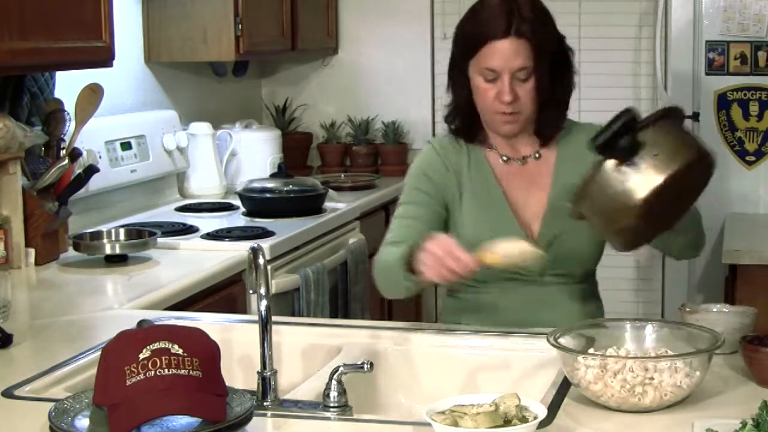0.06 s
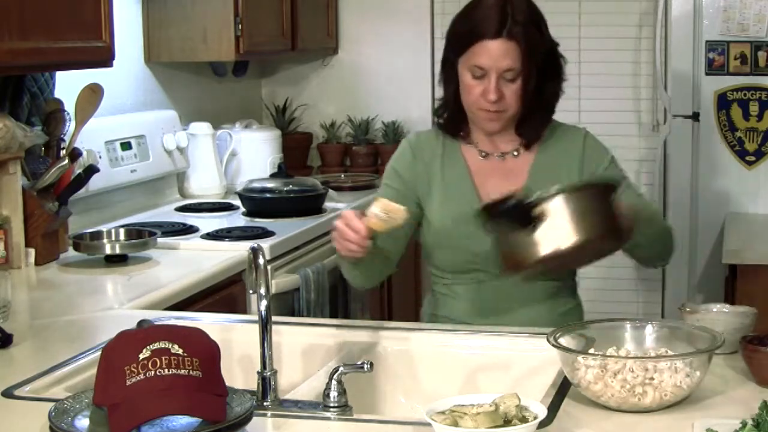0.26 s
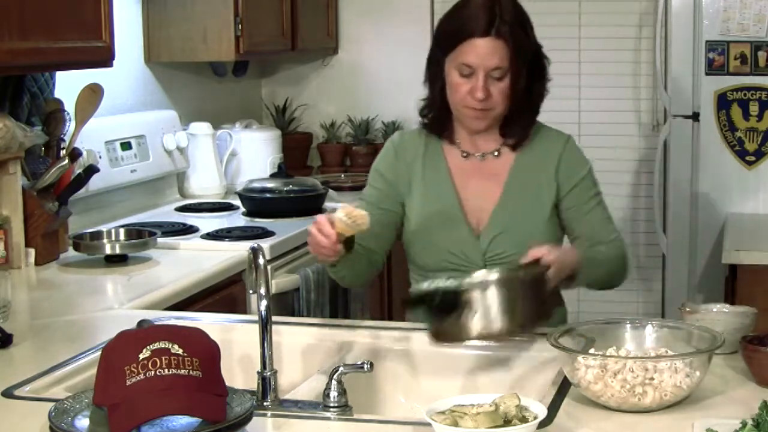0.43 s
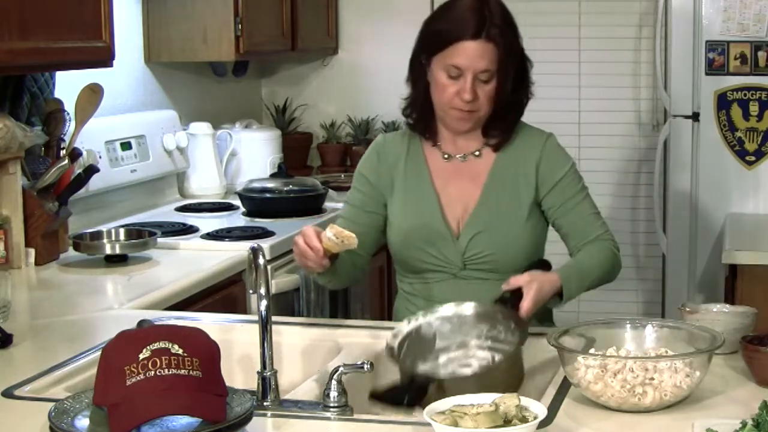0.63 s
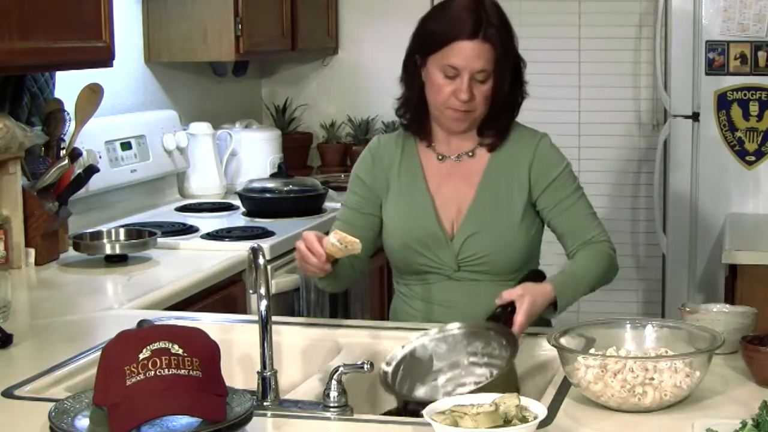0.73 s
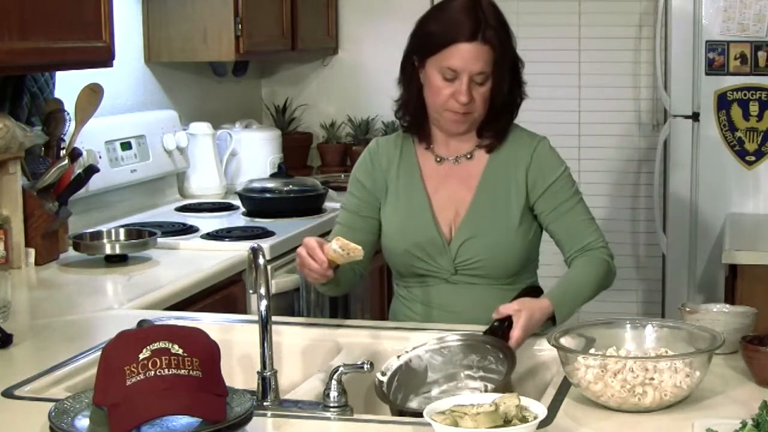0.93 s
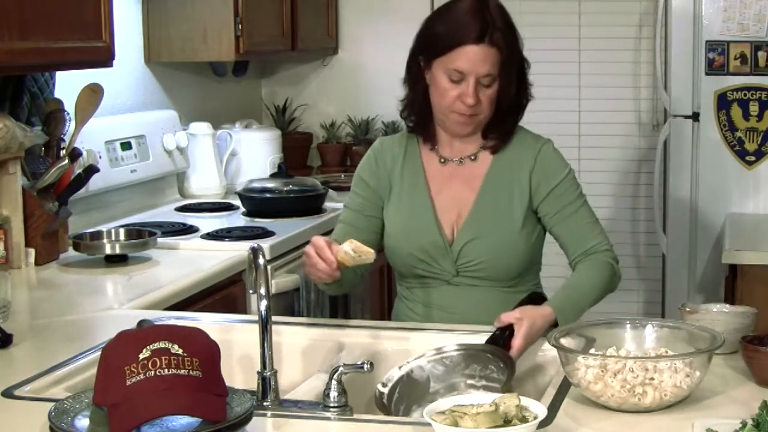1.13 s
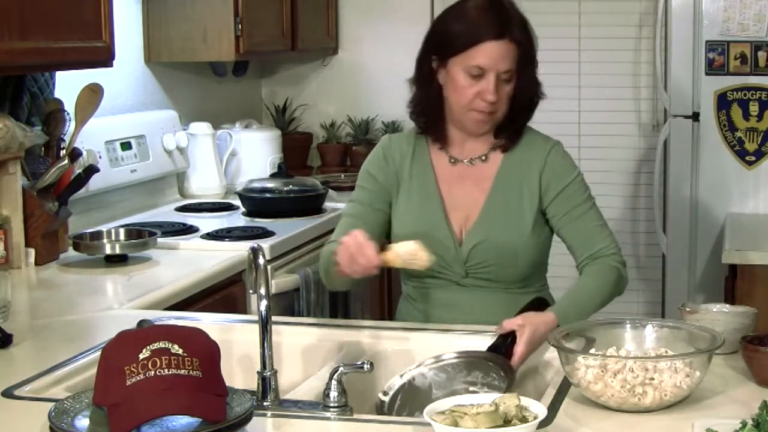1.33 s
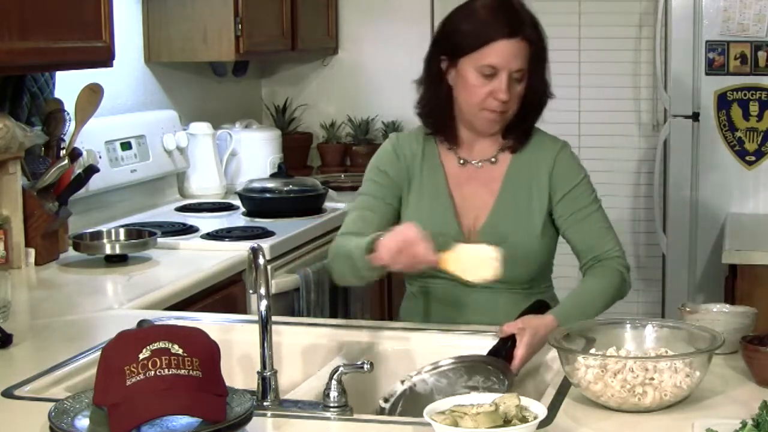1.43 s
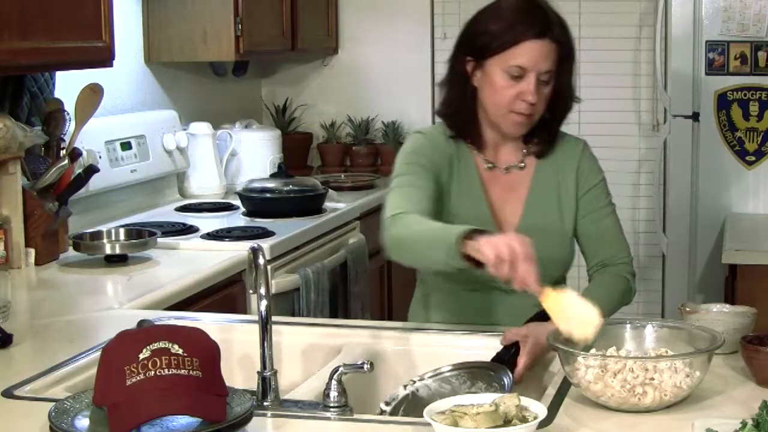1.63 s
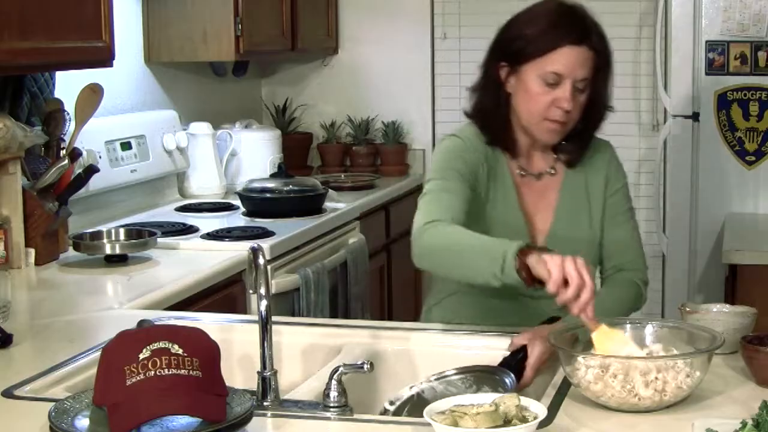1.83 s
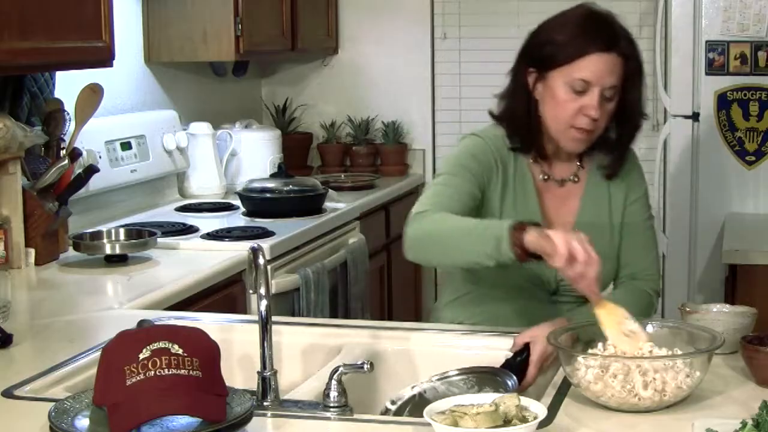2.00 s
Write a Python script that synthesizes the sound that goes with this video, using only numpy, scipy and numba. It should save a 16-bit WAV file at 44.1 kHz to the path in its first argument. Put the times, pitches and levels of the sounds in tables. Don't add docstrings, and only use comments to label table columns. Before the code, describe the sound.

Sudden metallic clank of a pot set down in a sink, bouncing briefly, after quiet room tone

```python
import sys
import numpy as np
from scipy import signal
from scipy.fft import rfft, irfft
from scipy.io import wavfile
from numba import njit

SR = 44100
rng = np.random.default_rng(int(sys.argv[2]) if len(sys.argv) > 2 else 0)


def natural_amplitude(level_db):
    exponent = np.asarray(level_db, float) / 20
    return 10 ** exponent


def materialize(psi):
    bounded = np.clip(np.atleast_2d(psi).T, -1, 1)
    quanta = np.round(bounded * 32767).astype(np.int16)
    wavfile.write(sys.argv[1], SR, quanta)


N = 90846

# (time [s], basin level [dB], pot level [dB], contact length [ms])
BLOWS = [
    (1.581, -30, -32.5, 0.52),
    (1.5849, -34.5, -41, 0.22),
    (1.593, -33, -39.5, 0.35),
    (1.622, -43.5, -45.5, 0.15),
    (1.667, -42, -45.5, 0.48),
    (1.678, -49, -46.5, 0.19),
]
# (time [s], level [dB], contact length [ms])
REBOUNDS = [
    (1.702, -37, 0.45),
    (1.711, -37.5, 0.24),
    (1.721, -39.5, 0.34),
    (1.762, -54, 0.34),
    (1.789, -56, 0.31),
]
# (time [s], level [dB], contact length [ms])
THUDS = [
    (1.583, -28, 2.64),
    (1.633, -35.5, 2.3),
    (1.7077, -37.5, 2.24),
    (1.724, -34, 2.86),
    (1.759, -38.5, 2.9),
    (1.801, -36.5, 6.2),
]
# (time [s], level [dB], pitch [Hz], time to fall 60 dB [s])
KNOCKS = [
    (1.944, -60, 900, .04),
    (1.960, -59.5, 1670, 0.046),
    (2.0053, -51, 435, 0.029),
    (2.0097, -50, 597.4, 0.17),
    (2.017, -68, 1080, 0.034),
    (2.027, -65, 1070, 0.041),
    (2.039, -54.5, 485, 0.024),
]
# (frequency [Hz], level [dB], time to fall 60 dB [s])
BASIN_MODES = [(538, -16, 0.22), (606, -13, 0.12), (608.4, 3, 0.18), (687.6, -6, 0.28), (708, -13, 0.11),
               (783, -17, .2), (845, -1.5, 0.13), (887, 2.5, .2), (900, 10.5, 0.078), (935, -1.5, 0.14),
               (979, -0.5, 0.2), (1114, -14, 0.099), (1167, 0.5, 0.12), (1266, -2.5, 0.13)]
# (frequency [Hz], level [dB], time to fall 60 dB [s])
POT_MODES = [(1392, -2.5, .2), (1566, -5.5, 0.53), (1680, -7, 0.13), (2506, -6, 0.083), (2580, -18, 0.19),
             (2717, -8.5, 0.14), (2860, -3.5, 0.079), (3143, -6, 0.32), (3790, -5.5, 0.22),
             (3840, -1.5, 0.056), (4355, -12.5, 0.17), (4530, -16, 0.098), (4947, -16, 0.25)]
# (frequency [Hz], level [dB], time to fall 60 dB [s])
TILTED_MODES = [(490, -11, 0.21), (527, -8.5, 0.13), (570, -2, 0.14), (617, 1.5, 0.13), (662, -5, 0.16),
                (695, 6.5, 0.033), (733, -2, 0.12), (768, -9, 0.48), (859.5, 3, 0.22), (964, -7, 0.17),
                (2180, -12, 0.16), (3170, -5, 0.13), (3600, -28, 0.076), (5000, -19, .08)]
# (frequency [Hz], level [dB], time to fall 60 dB
# [s])
BOTTOM_MODES = [(77.5, -17.5, 0.135), (108.4, -27, 0.66), (140, -22, 0.26), (182, -16, 0.45),
                (213.2, -7.5, 0.33), (224.26, -0.5, 0.48), (260, -7, 0.27), (277, -12.5, 0.25),
                (329.2, -5.5, 0.334)]
# (frequency [Hz], level [dB])
CLATTER_COLOUR = [(400, -19), (650, 1.5), (1300, -12.5), (2000, -12), (3750, -14), (7000, -21.5),
                  (10000, -35), (14000, -39)]
# (frequency [Hz], level [dB])
HISS_COLOUR = [(26, -30), (45, -4.5), (173, -3), (275, -3), (546, -7.5), (1010, -9), (15600, -17)]
# (time [s], length [s], level [dB], centre [Hz], width [Hz])
RUSTLES = [(0.094, 0.11, -71.5, 1570, 2520), (0.085, 0.071, -70.5, 154, 50), (0.296, 0.19, -70, 1050, 500),
           (0.368, .25, -74, 140, 30), (.52, 0.23, -70, 494, 93), (0.671, 0.053, -66, 2100, 2000),
           (0.765, 0.36, -75.5, 140, 30), (0.78, 0.38, -75, 490, 80), (1.893, 0.17, -70, 2450, 2590),
           (1.95, 0.6, -67, 1080, 900), (2.025, 0.074, -72, 1000, 1200), (1.9, 0.23, -68, 136, 70)]

REST_S, REST_RISE_S, REST_DB_PER_S = 1.779, 0.049, 228
POT_REST_SHARE, BOTTOM_REST_SHARE = 0.29, 0.5
RADIATES_HZ, BOTTOM_RADIATES_HZ = 500, 70
CLATTER_DB, CLATTER_REBOUND_DB, CHATTER_S, SHAKE_TOP_HZ = -31, -17.5, 0.0048, 11000
CLATTER_T60_S, CLATTER_T60_SLOPE = 0.3, -0.35
PAN_DB, SPREAD_RAD = 2, 0.3
ROOM_DB, ROOM_T60_S, ROOM_T60_SLOPE, ROOM_GAP_S = -10.5, 0.39, 0.04, 0.003
HISS_DB, HISS_ALIKE = -66.5, 0.082
HUM_HZ, HUM_DB = 30, -79


def pot_and_basin():
    basin_force = sum(push(at_s, db, ms) for at_s, db, _, ms in BLOWS)
    pot_force = sum(push(at_s, db, ms * 0.31) for at_s, _, db, ms in BLOWS)
    rebound_force = sum(push(*row) for row in REBOUNDS)
    thud_force = sum(push(*row) for row in THUDS)
    basin = modes(basin_force, *np.array(BASIN_MODES, float).T, flip=0.98)
    pot = modes(pot_force, *np.array(POT_MODES, float).T, POT_REST_SHARE)
    tilted = modes(rebound_force, *np.array(TILTED_MODES, float).T, flip=0.95)
    bottom = modes(thud_force, *np.array(BOTTOM_MODES, float).T, BOTTOM_REST_SHARE)
    walls = steep("high", RADIATES_HZ, basin + pot + tilted + clatter())
    return walls + steep("high", BOTTOM_RADIATES_HZ, bottom)


def clatter(count=380):
    t = np.arange(N) / SR
    place, loudness, decay = rng.random((count, 3)).T
    hz = 420 + 14000 * ((np.arange(count) + place) / count) ** 1.5
    db = colour(CLATTER_COLOUR, hz) + 5.3 * np.log10(hz / 1000) + 8 * (loudness - 0.5)
    t60 = CLATTER_T60_S * (hz / 1000) ** CLATTER_T60_SLOPE * (0.59 + 0.87 * decay)
    swell = 0
    for at_s, level_db in ((BLOWS[0][0], 0), (REBOUNDS[0][0], CLATTER_REBOUND_DB)):
        u = np.maximum(t - at_s, 0) / CHATTER_S
        swell = swell + natural_amplitude(level_db) * u * np.exp(-u)
    rough = steep("low", SHAKE_TOP_HZ, rng.standard_normal(N))
    shake = natural_amplitude(CLATTER_DB) * swell * rough / np.sqrt(CHATTER_S * SR)
    return modes(shake, hz, db, t60)


def push(at_s, db, ms):
    first = int(at_s * SR)
    length = max(ms, 0.08) * SR / 1000
    u = np.clip((np.arange(int(length) + 2) - at_s * SR % 1) / length, 0, 1)
    force = np.zeros(N)
    force[first:first + len(u)] = natural_amplitude(db) * np.sin(np.pi * u) ** 2 / (length / 2)
    return force


def modes(force, hz, db, t60, rest_share=0.81, flip=-1):
    t = np.arange(N) / SR
    resting = np.clip((t - REST_S) / REST_RISE_S + 0.5, 0, 1)
    rest = natural_amplitude(-rest_share * REST_DB_PER_S / SR * resting)
    turn = SPREAD_RAD * np.clip(hz / 670.0, 0.1, 1.5) * rng.standard_normal(len(hz))
    strength = flip ** np.arange(len(hz)) * natural_amplitude(db)
    gain = strength * np.exp(1j * np.outer([0.5, -0.5], turn))
    return ring(force, hz, np.clip(t60, 0.01, 0.9), gain, rest, 1.0 * SR)


@njit
def ring(x, hz, t60, gain, rest, sr):
    out = np.zeros((2, len(x)))
    first = np.argmax(x != 0)
    for k in range(len(hz)):
        p = np.exp((2j * np.pi * hz[k] - np.log(1000) / t60[k]) / sr)
        z = 0j
        for i in range(first, len(x)):
            z = z * p * rest[i] + x[i]
            out[0, i] += (gain[0, k] * z).imag
            out[1, i] += (gain[1, k] * z).imag
    return out


def steep(kind, hz, x):
    return signal.sosfilt(signal.butter(4, hz, kind, fs=SR, output="sos"), x)


def colour(table, hz):
    table = np.array(table, float)
    return np.interp(np.log(np.maximum(hz, 1)), np.log(table[:, 0]), table[:, 1])


def knocks():
    t, out = np.arange(N) / SR, 0
    detunes = rng.standard_normal((len(KNOCKS), 5))
    for (at_s, db, hz, t60), detune in zip(KNOCKS, detunes):
        u = np.maximum(t - at_s, 0)
        ratios = np.array([1.6, 0.81, 1.0, 4.0, 1.8]) * (1 + 0.035 * detune * [0, 1, 1, 1, 1])
        tones = np.sin(2 * np.pi * hz * np.outer(ratios, u))
        mixed = np.array([0.66, 0.53, 0.55, 0.22, 0.23]) @ tones
        out = out + natural_amplitude(db - 60 * u / t60) * mixed
    return out


def kitchen(x):
    t, tail = np.arange(SR // 2) / SR, 0
    for hz in 90 * 2 ** np.arange(8):
        octave = signal.butter(2, [hz / np.sqrt(2), hz * np.sqrt(2)], "band", fs=SR, output="sos")
        band = signal.sosfilt(octave, rng.standard_normal((2, len(t))))
        band = band + band[::-1] * np.clip(1 - hz / 680.0, 0, 1)
        t60 = ROOM_T60_S * (hz / 1000) ** ROOM_T60_SLOPE
        tail = tail + band * natural_amplitude(-60 * t / t60)
    tail = tail * (1 - np.exp(-(t / ROOM_GAP_S) ** 2))
    tail = tail / np.sqrt(np.sum(tail ** 2) / 2)
    return signal.fftconvolve(x[None], tail, axes=1)[:, :N]


def room_tone():
    t, hz = np.arange(N) / SR, np.arange(N // 2 + 1) * SR / N
    out = natural_amplitude(HISS_DB + 3.0) * noise(natural_amplitude(colour(HISS_COLOUR, hz)), HISS_ALIKE)
    for at_s, length, db, centre_hz, width_hz in RUSTLES:
        band = 1 / (1 + (2 * (hz - centre_hz) / width_hz) ** 2)
        swell = np.exp(-(2 * (t - at_s) / length) ** 2)
        out = out + natural_amplitude(db) * swell * noise(band, 0.59)
    return out


def noise(gain, alike):
    mid, side = irfft(rfft(rng.standard_normal((2, N))) * gain, N)
    alike = np.clip(alike, 0, 1)
    both = np.sqrt(1 + alike) * mid + np.sqrt(1 - alike) * side * np.array([[1], [-1]])
    return both / both.std()


def hum():
    return natural_amplitude(HUM_DB) * np.sin(2 * np.pi * HUM_HZ * np.arange(N) / SR)


def scene():
    near = pot_and_basin() + knocks()
    direct = near * natural_amplitude(np.array([[0.5], [-0.5]]) * PAN_DB)
    return direct + natural_amplitude(ROOM_DB) * kitchen(near[0]) + room_tone() + hum()


def top_cut(x):
    return signal.sosfilt(signal.butter(12, 15750, fs=SR, output="sos"), x)


def record(dry):
    return top_cut(dry)


dry = scene()
out = record(dry)
materialize(out)
```